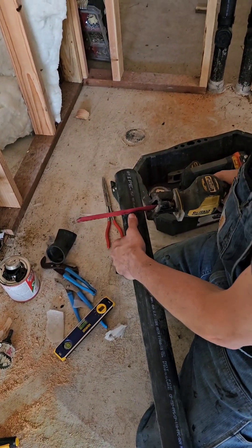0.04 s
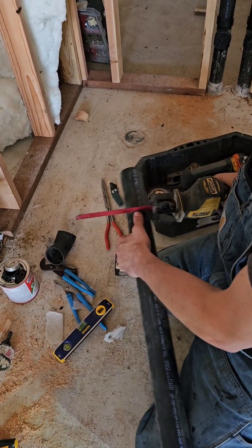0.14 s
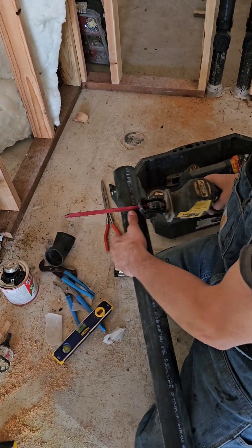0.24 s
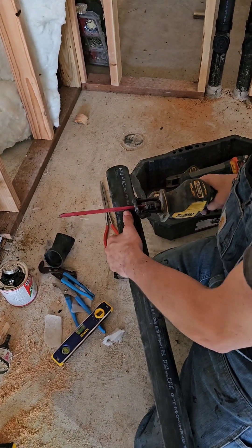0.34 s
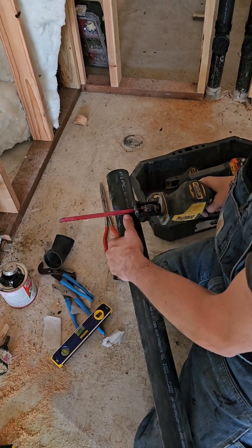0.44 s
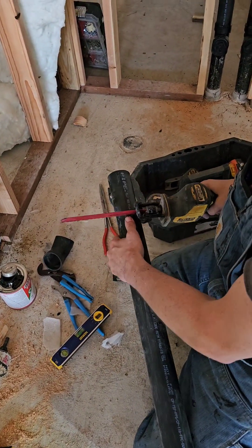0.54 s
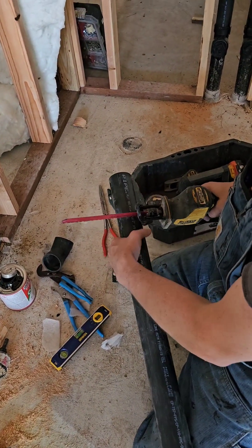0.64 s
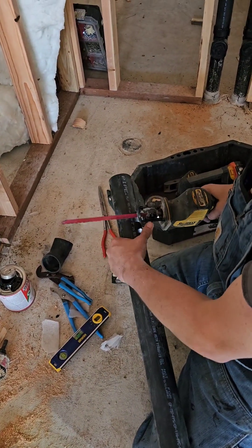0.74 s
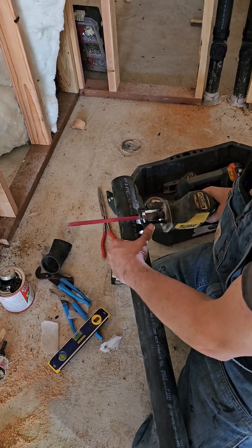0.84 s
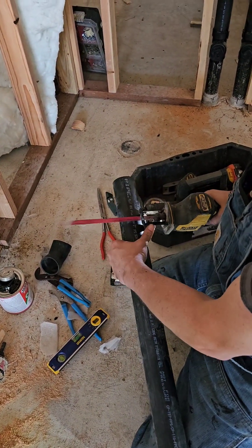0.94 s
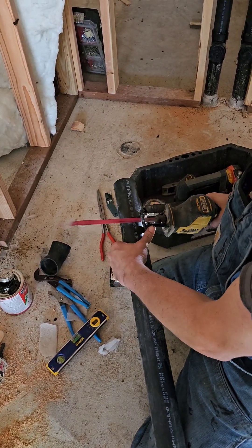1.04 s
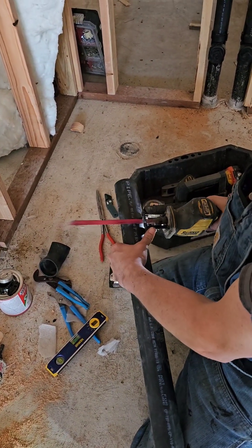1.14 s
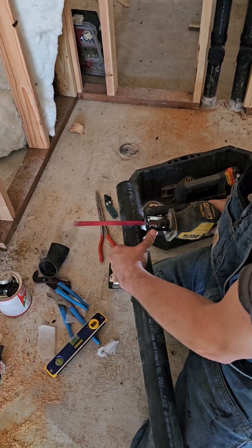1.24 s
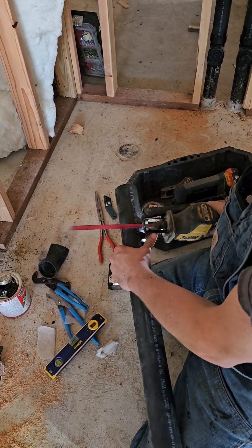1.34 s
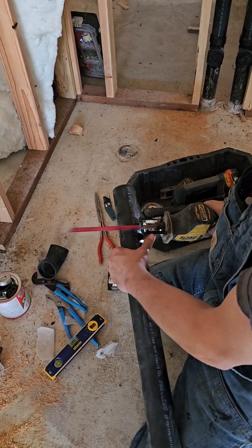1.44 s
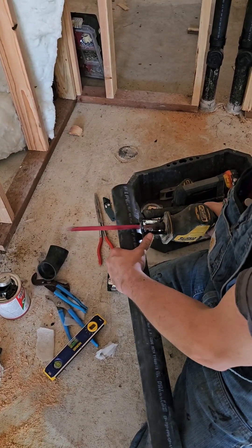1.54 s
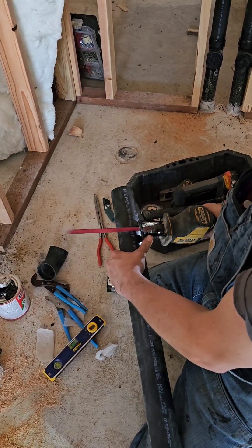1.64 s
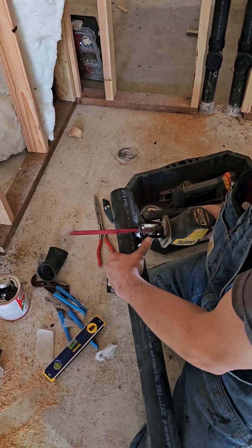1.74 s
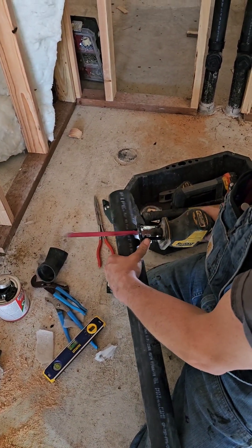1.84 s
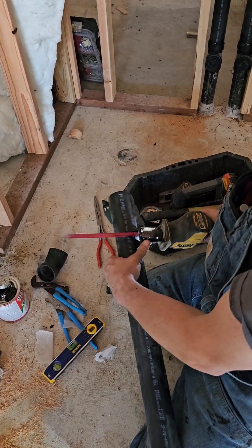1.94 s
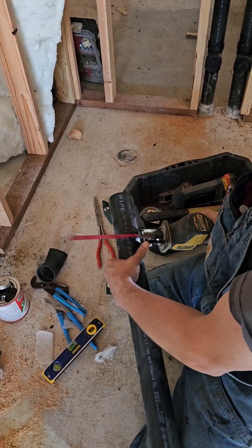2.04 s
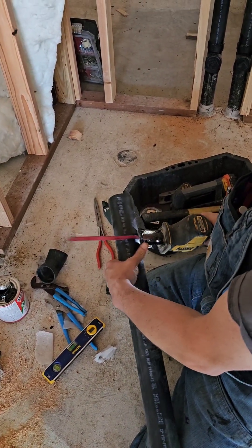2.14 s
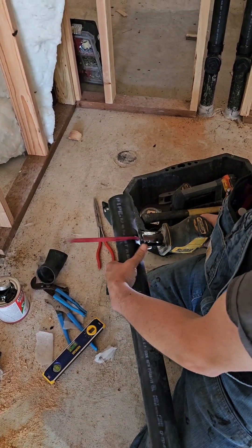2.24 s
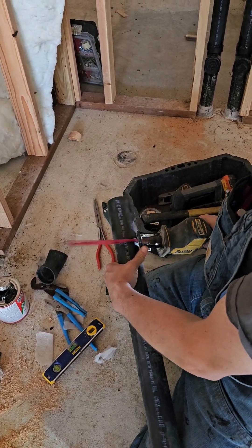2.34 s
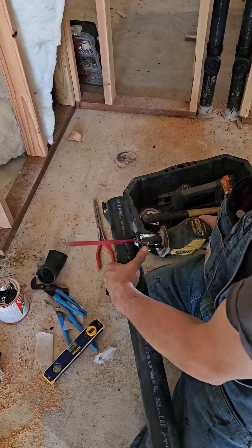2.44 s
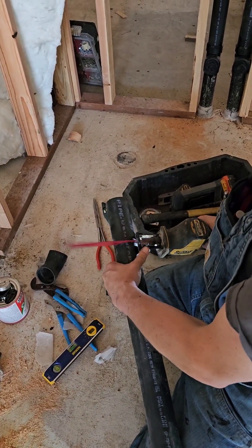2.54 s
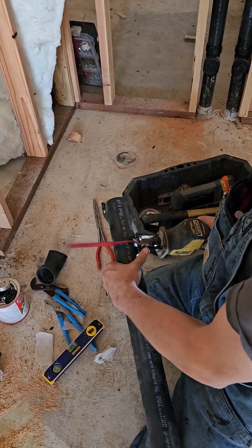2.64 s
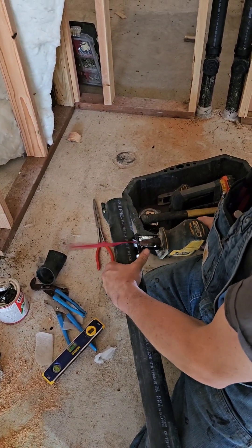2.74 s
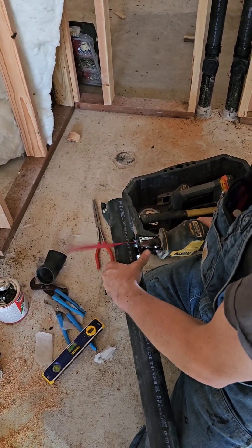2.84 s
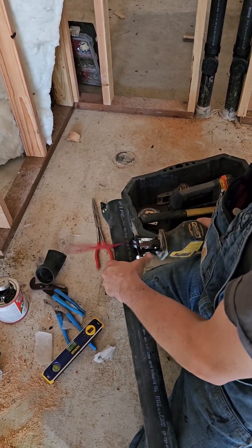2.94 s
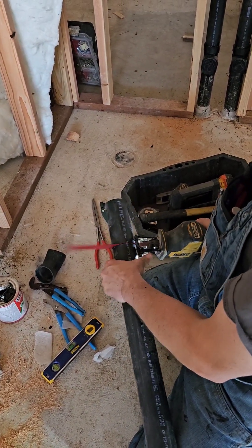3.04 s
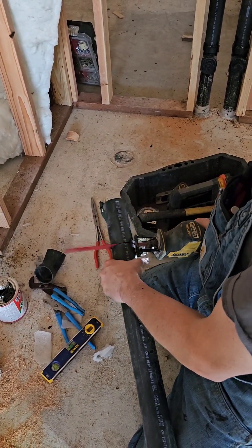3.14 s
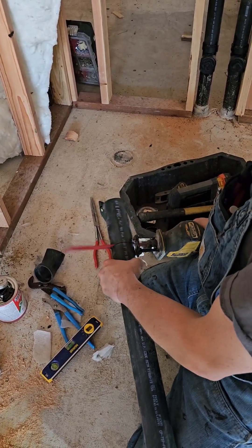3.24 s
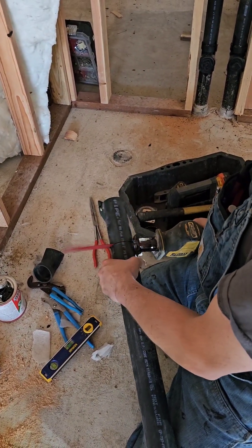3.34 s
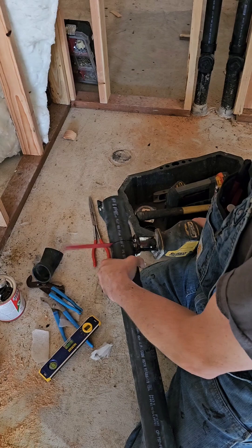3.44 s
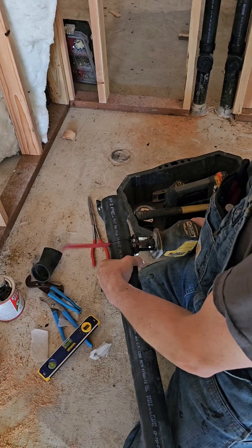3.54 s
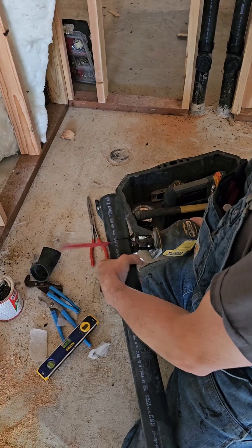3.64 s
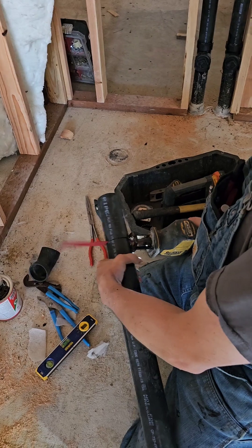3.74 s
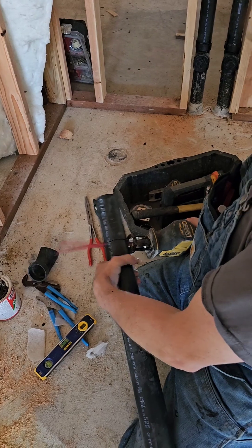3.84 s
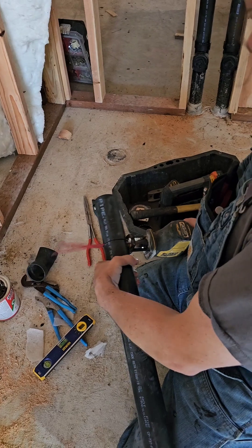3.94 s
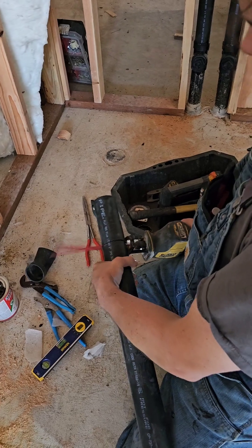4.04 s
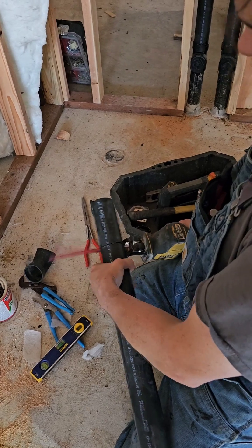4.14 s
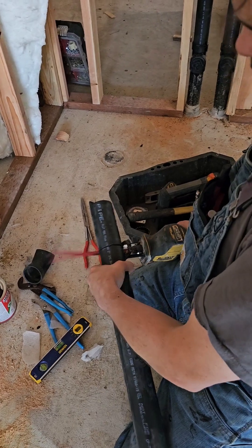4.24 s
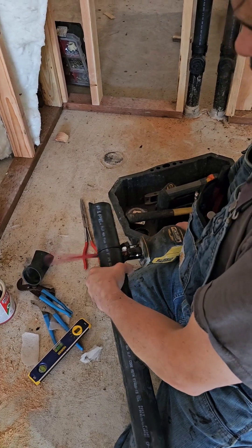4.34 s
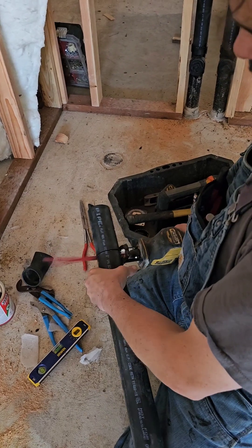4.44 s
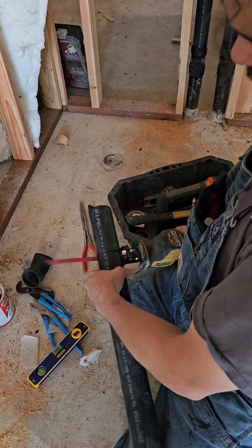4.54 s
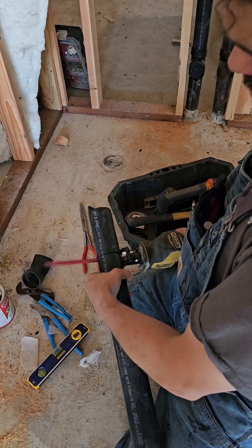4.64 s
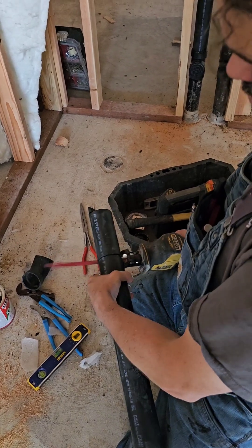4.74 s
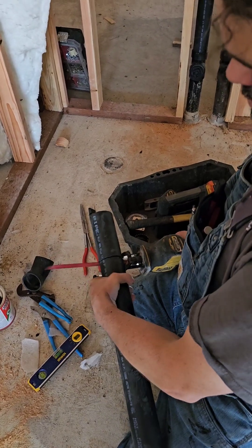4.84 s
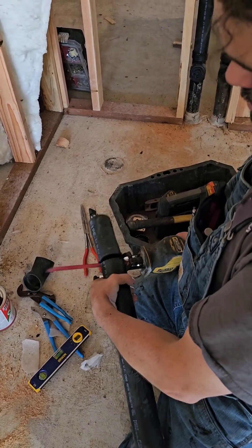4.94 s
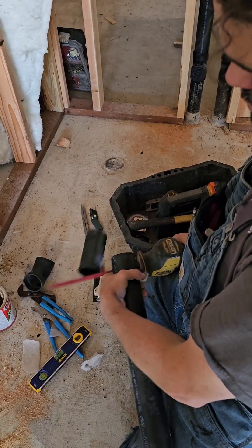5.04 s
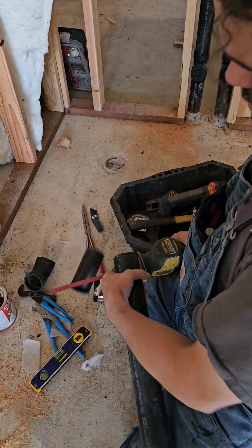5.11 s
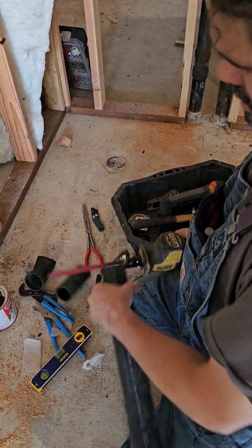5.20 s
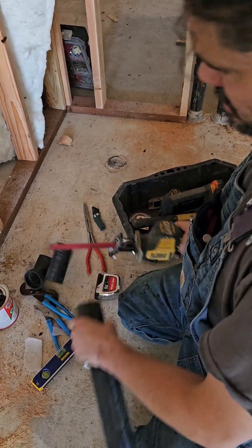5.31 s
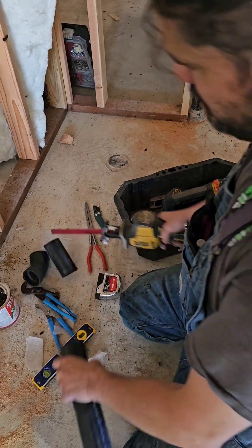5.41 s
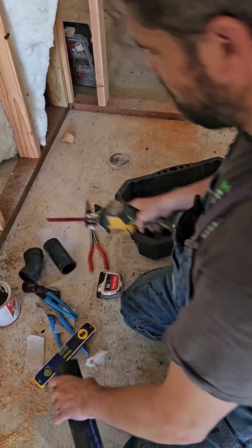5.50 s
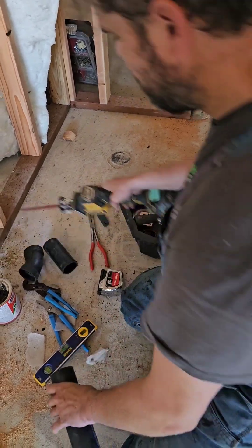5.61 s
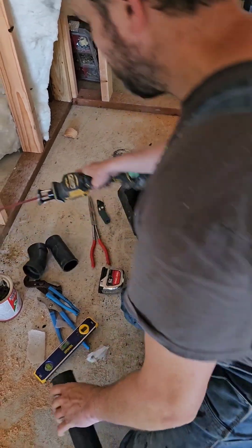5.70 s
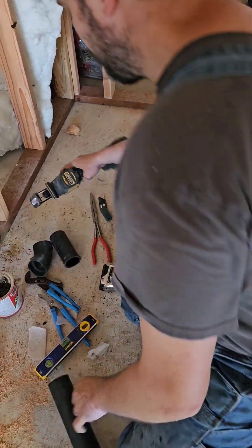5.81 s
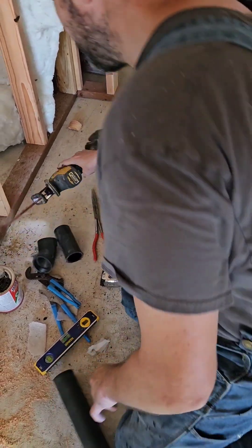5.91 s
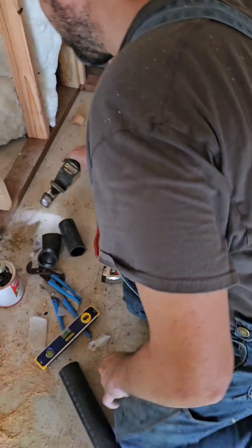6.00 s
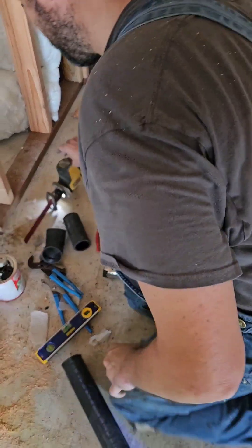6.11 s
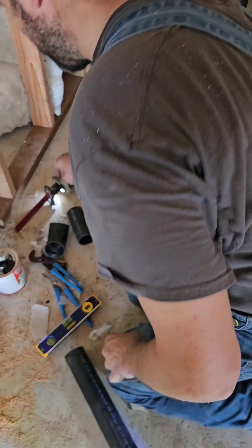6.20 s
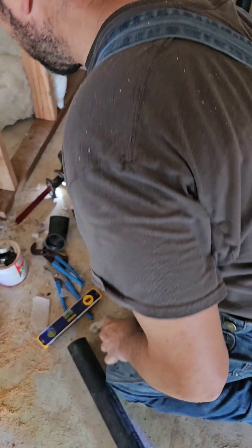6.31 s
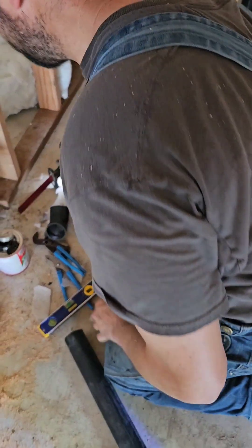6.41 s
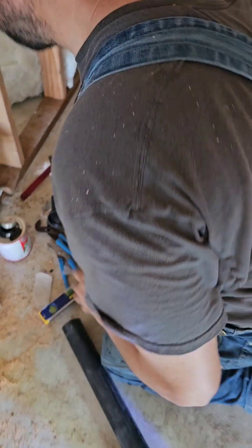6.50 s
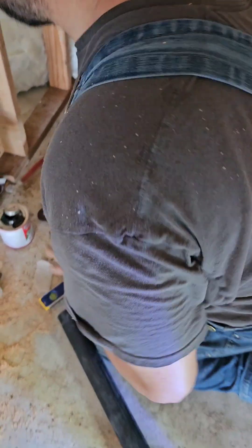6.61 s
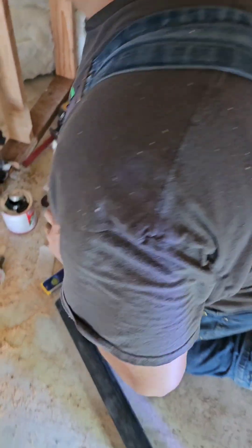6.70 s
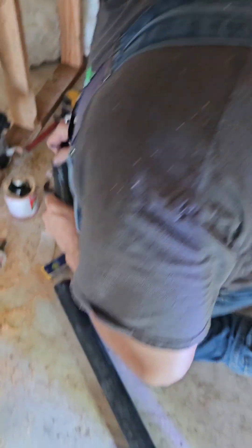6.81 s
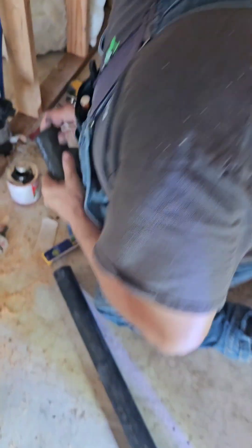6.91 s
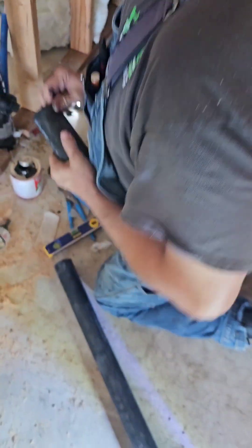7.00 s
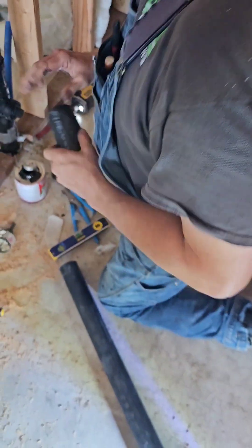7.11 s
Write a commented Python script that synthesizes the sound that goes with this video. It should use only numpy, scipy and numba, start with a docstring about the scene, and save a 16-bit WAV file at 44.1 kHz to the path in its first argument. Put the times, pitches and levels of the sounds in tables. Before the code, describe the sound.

Light handling knocks, then a harsh buzzing power saw chews through hollow plastic pipe, coasts to a stop, and pieces are set down with rustling cloth.

```python
"""Over a low beating hum, a plastic pipe and tools are knocked about, clothes rustle and bright metallic clicks ring.
A cordless reciprocating saw then spins up to about 46 strokes a second: filtered noise clacks with the gear at
both ends of the stroke, the teeth bite on the pull, and jolts shake resonators tuned to the pipe.
The motor coasts to rest; saw and pipe are set down with blows of noise and ringing modes, squeaks and rustling.
The room adds a short decaying noise tail to the saw, blows, clicks and squeaks."""
import sys
import numpy as np
from scipy import signal
from scipy.fft import rfft, irfft
from scipy.io import wavfile
from scipy.ndimage import uniform_filter1d
from numba import njit

SR = 44100
rng = np.random.default_rng(int(sys.argv[2]) if len(sys.argv) > 2 else 0)


def put_to_file(sound):
    """Save the sound as 16-bit audio at rate SR, in the file named by the first command-line argument."""
    columns = np.atleast_2d(sound).T  # one column per channel
    safe = np.clip(columns, -1, 1)
    whole_steps = np.round(safe * 32767)
    wavfile.write(sys.argv[1], SR, whole_steps.astype(np.int16))


N = 315756
BINS_HZ = np.maximum(np.fft.rfftfreq(N, 1 / SR), 1)

# Gently wavering low hum tones, which are nearly in step at IN_STEP_S, and the rumble beneath them.
HUM_TONES_HZ, IN_STEP_S = (54.28, 58.78, 60.53), .974
# Mean levels of the three tones in dB.
HUM_TONES_DB = (-41.5, -44.5, -49)
# Rumble spectrum. Each row: frequency in Hz, relative density in dB per Hz.
HUM = [(20, -11), (40, 2), (58, 4), (80, 3), (120, 2.5), (150, -19.5), (300, -17), (500, -47)]
HUM_DB = -42.5

# Blows of pipe and saw. Each row: start in seconds, relative crack in dB, relative ring in dB,
# frequency in Hz near which modes ring most, relative thud in dB, crack decay in seconds for 60 dB.
KNOCKS = [(0.095, -30.5, -36.5, 1300, -37, 0.029), (0.1761, -25, -51, 791, -19.5, 0.04),
          (0.1915, -28, -37, 1450, -34, 0.031), (0.721, -45, -48, 1540, -42, 0.15),
          (5.183, -4.5, -38, 1970, -57, 0.032), (5.349, -20, -42, 1230, -59, 0.056),
          (5.565, -23.5, -56, 1020, -61, 0.02), (5.602, -25, -38, 1435, -53, 0.049),
          (5.6536, -36, -44, 1420, -46, 0.078), (5.768, -30, -49, 2270, -41, 0.22),
          (5.7839, -26, -22.5, 600, -15, 0.13), (5.8, -8.5, -8, 1920, -11, 0.018),
          (5.896, -18.5, -23, 2280, -17, 0.034), (5.9194, -11.5, -27.5, 950, -18, 0.012),
          (5.966, -18, -28.5, 1440, -26, 0.031), (6.1069, -11.5, -21.5, 1230, -24, 0.098),
          (6.199, -35, -29, 720, -25, 0.083), (6.214, -27, -46, 710, -45, 0.13),
          (6.612, -24, -30.5, 800, -45, 0.21), (6.7118, -34, -34, 740, -47, 0.11),
          (6.785, -30, -46, 600, -42, 0.046), (6.939, -34, -48, 600, -28.5, .05),
          (6.998, -31, -56, 2080, -36, 0.042)]
# Ringing modes of the pipe. Each row: frequency in Hz, relative level in dB, t60 in seconds.
PIPE = [(472, 6.5, 0.22), (750, -2, 0.13), (997, 4, 0.1), (1256, 0.5, 0.035), (1426, -1.5, 0.092),
        (1930, 0, 0.027), (2070, -1.5, 0.026), (2320, -3, 0.037)]
# Modes of the short offcut. Each row: frequency in Hz, relative level in dB, t60 in seconds.
OFFCUT = [(395, -10, .08), (590, -19, 0.073), (834, 3.5, 0.044), (1270, -0.5, 0.053), (1495, -2, .07),
          (1980, -1, .06), (2500, 0, .05)]
OFFCUT_S = 6.05  # from then on the offcut is what is knocked
# Modes of the floor boards. Each row: frequency in Hz, relative level in dB, t60 in seconds.
THUD = [(111, -26, 0.051), (203, -44, 0.049), (233, -18, 0.063), (350, -19, 0.012)]
SNAP_DB, SNAP_T60_S = 1, 0.0096  # the first instant of a blow, against its tabled crack
BRIGHT_PER_DB = 0.6  # extra treble dB per dB of crack: harder blows crack brighter
RUB_WIDTH_HZ, RUB_LIFT_DB = 70, 7  # cracks and scuffs are coloured by the pipe modes
# The saw is put down to the right. Each row: time in seconds, left minus right of the bright clicks in dB.
ASIDE = [(5.4, 0), (5.48, -2.5), (5.8, -6), (6.2, -3), (6.4, 0)]

# Swishes of cloth and hands. Each row: time of the height in seconds, swell in seconds, fade in seconds,
# hiss in dB, thin treble hiss in dB, dull scuff in dB.
SWISHES = [(0.11, 0.011, 0.17, -44.5, -58, -57), (0.17, 0.054, 0.15, -41, -44, -38.5),
           (0.48, 0.064, .08, -70, -57, -84), (0.61, 0.092, 0.22, -59, -53.5, -54),
           (5.44, 0.72, 0.32, -45.5, -68, -45.5), (5.6, 0.11, 0.22, -70, -66, -47.5),
           (5.83, 0.051, 0.64, -50, -67, -30), (5.96, 0.18, 0.17, -38.5, -59, -42),
           (6.115, 0.094, 0.12, -29, -47, -32), (6.211, 0.044, 0.065, -33.5, -27, -41),
           (6.44, 0.15, 0.73, -48.5, -68, -78), (6.715, 0.03, 0.086, -37, -55, -44),
           (6.79, 0.12, 0.078, -34, -45, -37), (6.945, 0.09, 0.15, -35.5, -46, -39),
           (7.06, .1, 0.27, -74, -49, -72)]
SWISH_DEPTH_DB = 22  # level change over one swell time or one fade time
STIR_S, STIR_HISS_DB, STIR_SCUFF_DB = 0.13, -73.5, -73  # faint stirring from then on
# Cloth spectrum. Each row: frequency in Hz, relative density in dB per Hz.
CLOTH = [(590, -45), (1000, -6), (2030, -5), (2330, -5), (3800, -2), (5570, -6), (7440, -5.5), (16000, -18)]
# Thin treble cloth spectrum. Each row: frequency in Hz, relative density in dB per Hz.
FINE_CLOTH = [(3000, -29), (7000, 4), (12000, 3), (16000, 0)]
# Dull scuff spectrum. Each row: frequency in Hz, relative density in dB per Hz.
SCUFF = [(100, 11.5), (200, 16), (500, -2), (1500, -6.5), (3000, -21), (6000, -46)]

# Short bright metallic clicks, among them the saw's first clacks. Each row: start in seconds,
# relative peak in dB, relative treble in dB, ring in dB, frequency in Hz near which modes ring most.
TICKS = [(0.252, -3, -6, -18.5, 7950), (0.8425, -45, -35, -58, 6460), (0.9034, -8, -5, -42, 6500),
         (5.4226, -23, -44, -37, 5100), (5.458, -29, -50, -38, 3700), (5.4875, -20, -6.5, -13, 4070),
         (5.5896, -28, -20.5, -37, 8000), (5.9168, -42, -30, -22, 8200), (5.9648, -42, -22, -24.5, 8300),
         (6.3866, -33, -44, -41, 4300), (6.4, -28, -46, -40, 4300), (6.433, -26, -46, -42, 4250),
         (6.494, -25, -52, -43.5, 4300), (6.579, -33, -48, -46, 4300), (7.1437, -41, -39, -55, 5030)]
# Modes of the metallic ring. Each row: frequency in Hz, relative level in dB, t60 in seconds.
METAL = [(1900, -6, 0.0079), (3420, -4.5, 0.044), (3860, -5, 0.028), (4380, -5, 0.027), (5200, -4.5, .015),
         (6400, 4.5, 0.018), (6800, -12, .02), (7970, 4.5, 0.022), (11200, 2, 0.034), (14900, 3, .015)]
# Short squeaks. Each row: start in seconds, length in seconds, start pitch in Hz, end pitch in Hz, level in dB.
SQUEAKS = [(0.255, 0.033, 1200, 1010, -35), (5.347, 0.047, 1190, 1150, -31.5),
           (6.87, 0.03, 2030, 1870, -43), (6.893, 0.039, 1950, 2030, -46)]

# Crank motion: spin-up, steady running, coasting. Each row: time in seconds, strokes done;
# a whole number starts a pull.
STROKES = [(0.83, 0.9), (0.84, 1.0), (0.875, 1.45), (0.903, 2.0), (0.932, 3.0), (1.1, 10.04), (1.3, 19.02),
           (1.55, 30.52), (2.15, 58.32), (3.35, 113.42), (3.95, 141.09), (4.85, 182.74), (5.05, 192.22),
           (5.255, 202.0), (5.279, 203.0), (5.3085, 204.0), (5.3285, 204.5), (5.35, 205.0), (5.45, 205.45)]
FULL_SPEED = 46  # strokes a second
MOTOR_DB, DB_PER_HALF_SPEED = -17.5, 6.5  # level at full speed; loss per halving of speed
RELEASE_S, COAST_DB_PER_S = 5.28, 72  # the trigger is let go
COAST_HUSH_DB_PER_S = 70  # coasting, the hiss loses this as well
# Motor spectrum. Each row: frequency in Hz, relative density in dB per Hz.
MOTOR = [(300, -35), (500, -12), (1400, -5), (2700, -0.5), (3200, -1.5), (5000, -3.5), (7500, -2.5),
         (12300, -4), (14000, -3.5), (16000, -8)]
# Resonances of the saw housing. Each row: frequency in Hz, width in Hz, relative lift in dB.
HOUSING = [(6220, 250, -3), (7700, 900, 0), (11400, 400, -6), (14450, 600, 0), (15600, 700, 0)]
# Gear backlash spectrum. Each row: frequency in Hz, relative density in dB per Hz.
CLACK = [(1500, -23), (4000, -1.5), (8000, -1), (11000, -0.5), (16000, 2.5)]
CLACK_DB = -6  # against the motor
WHINE_DB, WHINE_PER_BITE, WHINE_TOP_DB = -23, -1.7, -3  # against the motor; louder as the blade runs free
# Rough resonances in the rasp. Each row: mean frequency in Hz, wander in Hz, t60 in seconds,
# mean level against the motor in dB.
RASP = [(1274, 100, 0.0055, -14.5), (3120, 69, 0.0064, -17.5), (4450, 78, 0.0037, -18),
        (6280, 130, 0.0043, -14), (7480, 280, 0.0024, -15), (11140, 390, 0.0049, -18.5)]
RASP_SWELL_DB = 3.3
# Faint gear whine. Each row: multiple of the stroke rate, relative level in dB.
GEARS = [(69.2, -21.5), (96.0, -26)]

# Course of the cut. Each row: time in seconds, then levels in dB relative to the motor: bite of the teeth,
# shake of the pipe, bounce at every second pull, hollow ring.
CUT = [(0.83, -11.5, -6, -47, -26), (0.95, -6.5, -10.5, -38, -14), (1.15, -2, -4, -10, -16),
       (1.34, -1, -0.5, -7, -27), (1.48, -9.5, -5, -14, -18), (1.8, -4.5, -3.5, -13, -24),
       (2.1, -2, -5, -7.5, -19), (2.3, -1.5, -1.5, -16, -24), (2.7, 1, -3.5, -11, -13.5),
       (3.1, 0.5, -1.5, -9.5, -12.5), (3.25, 0, 0, -10, -13), (3.45, -2, -9.5, -55, -23),
       (3.9, -2, -8.5, -35, -15), (4.1, -1, -11, -13, -6), (4.4, -4, -14, -22, -15.5),
       (4.7, -7.5, -12, -50, -19.5), (4.95, -5.5, -12, -42, -24), (5.1, -34, -26.5, -52, -11.5),
       (5.26, -9.5, -27, -45, -27), (5.423, -51, -19, -45, -14)]
# Spectrum of the teeth. Each row: frequency in Hz, relative density in dB per Hz.
TEETH = [(70, -6), (150, 0.5), (400, -4.5), (1000, 3), (2000, 3), (4000, -5.5), (8000, -2.5),
         (16000, -16.5)]
# Resonances of the pipe wall under the teeth. Each row: frequency in Hz, width in Hz, relative lift in dB.
WALL = [(610, 18, 10.5), (1000, 88, 3.5), (1080, 17, 8.5), (1425, 114, 8), (1626, 39, -1), (2237, 61, -9.5),
        (3070, 110, 2), (3810, 390, 2), (4340, 190, -1), (5480, 280, -3)]
HOLLOW_HZ, HOLLOW_WIDTH_HZ = 780, 185
# Blade against the pipe. Each row: time in seconds, slap against the teeth in dB, its mean pitch in Hz,
# relative gear whine in dB.
BLADE = [(0.9, -29, 1840, 16), (1.3, -10.5, 1910, -5), (1.5, -10, 1910, 16.5), (2.0, -10.5, 1850, 3.5),
         (2.25, -12.5, 1870, -10), (2.65, -17.5, 1850, -3), (3.0, -11, 1890, -16), (3.5, -17, 2130, -10),
         (4.05, -11.5, 2130, 2), (4.4, -11, 2120, 3), (4.7, -13, 2090, 8), (5.2, -15, 2090, -4)]
SLAP_WANDER_HZ = 59

# The shaken pipe's pitch rises with the motor, falls, then keeps wandering through the cut. Each row:
# time in seconds, mean pitch in Hz, overtone in Hz, overtone against the shake in dB.
SHAKE_PITCH = [(0.84, 190, 400, -14), (0.92, 310, 440, -10), (1.0, 285, 450, -12), (1.11, 228, 455, -8),
               (1.37, 212, 430, -9), (1.45, 240, 450, -12), (1.88, 208, 440, -10), (2.2, 228, 440, -9),
               (2.42, 275, 445, -10), (2.6, 225, 440, -6), (3.15, 215, 455, -6), (3.4, 225, 425, -5),
               (3.83, 245, 420, -4), (4.1, 210, 420, -6), (4.9, 234, 420, -8)]
# Steady pipe modes beside the moving ones. Each row: frequency in Hz, relative level in dB, t60 in seconds.
SHAKE = [(250, -6, .04), (315, -4, .04)]
SHAKE_WANDER_HZ, SHAKE_T60_S, OVERTONE_T60_S = 8, .055, .035
UNEVEN = 1.6  # how unequal two pulls jolt a bouncing pipe
SPIN_UP_HUM_DB, SPIN_UP_S = -30, .13  # the pipe hums clearly while the motor gathers speed
# Tones locked to the crank. Each row: multiple of the stroke rate, relative level in dB,
# share of the shake level they follow.
ORDERS = [(2.0, -22, 0.29), (3.0, -32, 0.53), (4.0, -18, 0.92), (5.0, -15, 0.67), (6.0, -13.5, 1)]
BOUNCE_ORDER = 4.5
# Dull spots in the saw's sound. Each row: frequency in Hz, width in Hz, depth from 0 to 1.
DIPS = [(352, 17, 0.84), (537, 106, 0.38), (944, 41, 0.73), (2720, 270, 0.37), (4980, 130, 0.2),
        (5860, 170, 0.4), (6400, 190, 0.32)]

# Likeness of the two sides. Each row: frequency in Hz, share of power common to both.
LIKENESS = [(60, .96), (250, .96), (500, .78), (1000, .52), (2000, .48), (4000, .3), (8000, .42),
            (15000, .38)]
# Balance of the sides. Each row: frequency in Hz, left minus right in dB.
TILT = [(60, -3), (180, 0), (550, -1), (1650, 0.5), (4970, -2), (15000, 0.5)]
# Phase of the common part. Each row: frequency in Hz, lead of the left in radians.
LEAD = [(20, -0.73), (430, 0.4), (1000, -2.04), (1900, -0.26), (3000, 1.35), (5600, 0.88), (9400, 1.73),
        (16000, 1.35)]
ROOM_T60_S, ROOM_DB = 0.27, -11.5
CUTOFF_HZ = 15740


def from_db(db):
    """Decibel law: the amplitude gain of a level."""
    return 10 ** (np.asarray(db) / 20)


def fade_per_sample(t60):
    """Exponential decay: the pole radius that loses 60 dB in t60 seconds."""
    return from_db(-60 / (t60 * SR))


def rms_one(x):
    """Normalisation of power: scaled to rms 1."""
    return x / np.sqrt(np.mean(x ** 2) + 1e-20)


def in_time(rows):
    """Linear interpolation: the columns of a curve, sample by sample."""
    s, *columns = np.transpose(rows)
    return [np.interp(np.arange(N) / SR, s, c) for c in columns]


def at_bins(points):
    """Interpolation on a logarithmic frequency axis, at every bin."""
    hz, value = np.transpose(points)
    return np.interp(np.log(BINS_HZ), np.log(np.maximum(hz, 1)), value)


def drift(rate):
    """Low-passed noise: a random wander of spread 1, mostly slower than a rate in Hz."""
    return rms_one(irfft(rfft(rng.standard_normal(N)) / (1 + (BINS_HZ / rate) ** 2), N))


def band(x, low_hz, high_hz):
    """Causal band-pass filtering."""
    return signal.sosfilt(signal.butter(2, [low_hz, high_hz], "band", fs=SR, output="sos"), x)


def ring(x, modes):
    """Modal superposition: x excites every mode as a damped two-pole resonator."""
    out = 0
    for hz, db, t60 in modes:
        r, w = fade_per_sample(t60), 2 * np.pi * hz / SR
        out = out + signal.lfilter([0, from_db(db) * np.sin(w)], [1, -2 * r * np.cos(w), r * r], x + 1e-18)
    return out


@njit
def glide(x, hz, r, sr):
    """Time-varying resonance: a two-pole resonator whose pitch moves."""
    y = np.zeros(len(x))
    for i in range(2, len(x)):
        w = 2 * np.pi * hz[i] / sr
        y[i] = np.sin(w) * x[i - 1] + 2 * r * np.cos(w) * y[i - 1] - r * r * y[i - 2]
    return y


def pair(common, own):
    """Partial coherence: spectra of two sides from a phase-shifted common part and independent parts."""
    alike = np.clip(at_bins(LIKENESS), 0, 1)
    sides = np.array([[1], [-1]])
    shifted = rfft(common) * np.exp(.5j * sides * at_bins(LEAD))
    mixed = np.sqrt(alike) * shifted + np.sqrt(1 - alike) * rfft(own)
    return mixed * from_db(sides * at_bins(TILT) / 2)


def resonance(hz, width):
    """Resonance curve: a Lorentzian of height 1."""
    return 1 / (1 + (2 * (BINS_HZ - hz) / width) ** 2)


def hiss(envelope, spectrum, peaks=(), lift_db=0):
    """Source and filter: stereo noise under an envelope, coloured and lifted at resonances; rms 1."""
    white = envelope * rng.standard_normal((3, N))
    bumps = 1 + sum(from_db(lift_db + db) * resonance(hz, width) for hz, width, db in peaks)
    return rms_one(irfft(pair(white[0], white[1:]) * bumps * from_db(at_bins(spectrum)), N))


def clicks(times, db):
    """Impulse excitation: a one-sample click at each time."""
    out = np.zeros(N)
    out[(np.asarray(times) * SR).astype(int)] = from_db(db)
    return out


def dying(times, db, t60):
    """Transient envelope: a rise within a millisecond or two, then exponential decay."""
    out, t = np.zeros(N), np.arange(SR // 2) / SR
    for s, level_db, decay in zip(times, db, t60):
        i = int(s * SR)
        fall = from_db(level_db - 60 * t / max(decay, .005))
        rise = 1 - np.exp(-t / 0.0013)
        out[i:i + len(t)] += (fall * rise)[:N - i]
    return out


def struck(times, db, near_hz, modes, reach_db):
    """Selective modal excitation: modes weaken by reach_db for each octave from near_hz."""
    out = 0
    for mode in modes:
        octaves = np.abs(np.log2(mode[0] / near_hz))
        out = out + ring(clicks(times, db - reach_db * octaves), [mode])
    return out


def rubbed():
    """Resonant colouring: pipe modes, and two of the offcut's, as peaks in a noise."""
    return [(hz, RUB_WIDTH_HZ, RUB_LIFT_DB) for hz, db, t60 in PIPE + OFFCUT[1:3]]


def aside():
    """Level-difference panning: left and right gain of the bright clicks."""
    pan_db, = in_time(ASIDE)
    return from_db(np.array([[.5], [-.5]]) * pan_db)


def hum():
    """Beating: wavering low tones of nearby frequency interfere, over rumble."""
    t = np.arange(N) / SR - IN_STEP_S
    tones = 0
    for hz, db in zip(HUM_TONES_HZ, HUM_TONES_DB):
        tones = tones + from_db(db + 2.2 * drift(3)) * np.cos(2 * np.pi * hz * t + .3 * drift(3))
    return np.sqrt(2) * tones + from_db(HUM_DB) * hiss(1, HUM)


def knocks():
    """Impact: each blow is a crack of noise, the modal ring of the pipe and a thud in the floor."""
    s, crack_db, ring_db, near_hz, thud_db, decay = np.transpose(KNOCKS)
    snap = dying(s, crack_db + SNAP_DB, np.full(len(s), SNAP_T60_S))
    body = dying(s, crack_db - 3, decay)
    grain = from_db(1.96 * drift(150))
    out = (snap + body) * hiss(grain, [(500, -4.5), (2000, -3.5), (4000, -1.0), (16000, -11)], rubbed())
    bright = dying(s, (1 + BRIGHT_PER_DB) * crack_db - 0.5, decay)
    out = out + aside() * bright * hiss(1, [(1500, -25), (4000, -12.0), (9000, 7), (16000, -4)])
    for hit, modes, reach_db in (s < OFFCUT_S, PIPE, 17.0), (s >= OFFCUT_S, OFFCUT, 9.0):
        out = out + struck(s[hit] + 0.001326, ring_db[hit] + 0.5, near_hz[hit], modes, reach_db)
    return out + ring(band(clicks(s, thud_db + 16.5), 72, 400), THUD)


def rustle():
    """Friction noise: grainy cloth hiss and dull scuffing swell and fade with each move."""
    t = np.arange(N) / SR
    cloth = hiss(from_db(2.7 * drift(60) + 1.5 * drift(400)), CLOTH)
    fine = hiss(from_db(2.0 * drift(80)), FINE_CLOTH)
    scuff = hiss(from_db(2.0 * drift(16) + 2.0 * drift(110)), SCUFF, rubbed())
    out = (t > STIR_S) * (from_db(STIR_HISS_DB) * cloth + from_db(STIR_SCUFF_DB) * scuff)
    for s, swell, fade, hiss_db, fine_db, scuff_db in SWISHES:
        shape = from_db(-SWISH_DEPTH_DB * np.where(t < s, (s - t) / swell, (t - s) / fade))
        out = out + shape * (from_db(hiss_db) * cloth + from_db(fine_db) * fine + from_db(scuff_db) * scuff)
    return out


def ticks():
    """Impact of metal: a sharp click of noise and a short modal ring."""
    s, peak_db, treble_db, ring_db, near_hz = np.transpose(TICKS)
    decay = np.full(len(s), .009)
    snap = dying(s, peak_db - 2.0, decay) * hiss(1, [(500, -9), (2000, 8.0), (6000, 1.5), (16000, -28)])
    treble = dying(s, treble_db + 7.0, decay) * hiss(1, [(3000, -11), (8000, 4), (12000, -1), (16000, -3.5)])
    return aside() * (snap + treble + struck(s + 0.0007, ring_db, near_hz, METAL, reach_db=9.0))


def squeaks():
    """Frequency modulation: slightly rough gliding tones that swell fast and fade."""
    out, waver = np.zeros(N), 1 + 0.024 * drift(60)
    for s, length, from_hz, to_hz, db in SQUEAKS:
        u = np.linspace(0, 1, int(length * SR))
        span = slice(int(s * SR), int(s * SR) + len(u))
        hz = (from_hz + (to_hz - from_hz) * u) * waver[span]
        out[span] += from_db(db) * np.sin(np.pi * u ** 0.42) * np.sin(2 * np.pi * np.cumsum(hz) / SR)
    return out * from_db(4.1 * drift(150))


def motor_and_clack(clack, hush):
    """Backlash: motor noise pulses, and brighter noise clacks, as the gear takes up its play."""
    motor = hush * hiss((1 + 0.79 * clack) * from_db(1.0 * drift(40)), MOTOR, HOUSING, lift_db=-2)
    return motor + from_db(CLACK_DB) * hiss(clack, CLACK, HOUSING, lift_db=7)


def rasp(envelope):
    """Wandering resonance: noise in narrow bands, each swelling on its own."""
    out, white = 0, envelope * rng.standard_normal((3, N))
    for hz, wander_hz, t60, db in RASP:
        pitch, swell = hz + wander_hz * drift(2.7), from_db(db + RASP_SWELL_DB * drift(4.8))
        out = out + swell * rms_one(np.array([glide(w, pitch, fade_per_sample(t60), SR) for w in white]))
    return irfft(pair(out[0], out[1:]), N)


def gears(turns):
    """Gear mesh: rough, wavering tones at multiples of the stroke rate."""
    out = 0
    for k, db in GEARS:
        out = out + from_db(db + 0.98 * drift(32)) * np.sin(2 * np.pi * k * turns + 0.54 * drift(20))
    return out


def teeth(pull, luck, tear):
    """Chip formation: noise surges in each pull, coloured by the resonances of the pipe wall."""
    bite = .9 * from_db(3.5 * luck) * np.exp(-((pull - .3) / 0.22) ** 2)
    return hiss((1 + bite) * tear, TEETH, WALL, lift_db=-3.5)


def hollow_ring(pull, luck, tear):
    """Cavity-like resonance: noise pulsed by each pull around one broad peak."""
    surge = (1 - np.exp(-pull / .08)) * np.exp(-pull / .2)
    envelope = (.3 + 3.0 * from_db(3.5 * luck) * surge) * tear
    return hiss(envelope, [(400, -26), (700, 8), (900, 6), (1500, -24)], [(HOLLOW_HZ, HOLLOW_WIDTH_HZ, 18)])


def blade_slap(turns, pull, luck, slap_hz):
    """Impact at the start of the pull: a click and a rattle excite a short moving resonance."""
    strike = np.roll(np.diff(turns.astype(int), prepend=0), round(0.001962 * SR))
    rattle = (1 - np.exp(-pull / .05)) * np.exp(-pull / .2) * rng.standard_normal((3, N))
    bursts = from_db(1.8 * luck) * (.6 * strike + .07 * rattle)
    pitch = slap_hz + SLAP_WANDER_HZ * drift(9.4)
    rings = [glide(b, pitch, fade_per_sample(.017), SR) for b in bursts]
    return rms_one(irfft(pair(rings[0], rings[1:]), N))


def shaken_pipe(ends, luck, shake_db, bounce_db):
    """Forced vibration: jolts at the stroke ends drive moving and steady pipe modes; also gives the pitch."""
    turned = np.diff(ends, prepend=ends[0])
    push = np.where(ends % 2, .35, 1)  # the return is weak
    alternate = np.where(ends // 2 % 2, 1, -1)
    push = push * (1 + alternate * np.clip(UNEVEN * from_db(bounce_db - shake_db), 0, .8))
    jolts = np.roll(turned * push * from_db(2.5 * luck), round(0.003 * SR)) + 0.04 * rng.standard_normal(N)
    jolts = band(band(jolts, 175, 500), 160, 900)
    shake_hz, overtone_hz, overtone_db = in_time(SHAKE_PITCH)
    shake_hz = shake_hz + SHAKE_WANDER_HZ * drift(2.1)
    shake = rms_one(glide(jolts, shake_hz, fade_per_sample(SHAKE_T60_S), SR) + ring(jolts, SHAKE))
    overtone = rms_one(glide(jolts, overtone_hz, fade_per_sample(OVERTONE_T60_S), SR))
    return from_db(shake_db - 3) * (shake + from_db(overtone_db) * overtone), shake_hz


def drone(turns, shake_db, bounce_db):
    """Harmonic orders: sines locked to the crank, each wandering in phase and most in level."""
    tones = [(round(k), db + share * shake_db + 2.5 * drift(2.5)) for k, db, share in ORDERS]
    tones = tones + [(BOUNCE_ORDER, bounce_db)]
    out = 0
    for k, db in tones:
        out = out + from_db(db) * np.cos(2 * np.pi * k * (turns - .3) + 0.55 * drift(5))
    return np.sqrt(2) * out


def saw():
    """Periodic excitation: the crank times the motor, gear, teeth and shaken pipe."""
    t = np.arange(N) / SR
    turns, = in_time(STROKES)
    speed = uniform_filter1d(np.gradient(turns) * SR, size=SR // 60) / FULL_SPEED
    coasting = np.maximum(t - RELEASE_S, 0)
    hush = from_db(-COAST_HUSH_DB_PER_S * coasting)
    power_db = MOTOR_DB + DB_PER_HALF_SPEED * np.log2(speed + 1e-3) - COAST_DB_PER_S * coasting
    bite_db, shake_db, bounce_db, hollow_db = in_time(CUT)
    slap_db, slap_hz, gear_db = in_time(BLADE)

    ends = (2 * turns).astype(int)  # stroke ends passed so far
    luck = rng.standard_normal((ends[-1] + 1, 4))[ends].T  # each half stroke differs
    half, pull = 2 * turns % 1, turns % 1
    since = half / np.clip(speed, .3, 1)  # time since the reversal, in full-speed half strokes
    clack = 1.5 * from_db(2.0 * luck[0]) * (1 - np.exp(-since / 0.04)) * np.exp(-since / 0.22)
    tear = from_db(3.2 * drift(1500))  # teeth tear chips unevenly

    whine = hiss(1 + 2.2 * clack, [(7000, -27), (8500, 3.0), (10000, 8), (12000, -2.0), (15000, -29)])
    whine_db = np.minimum(WHINE_DB + WHINE_PER_BITE * bite_db, WHINE_TOP_DB)
    drive = motor_and_clack(clack, hush) + hush * rasp((1 + clack) * tear) + hush * from_db(whine_db) * whine
    drive = drive + from_db(bite_db + gear_db + 2) * gears(turns)
    slap = from_db(slap_db) * blade_slap(turns, pull, luck[3], slap_hz)
    cut = from_db(bite_db) * (teeth(pull, luck[1], tear) + slap)
    cut = cut + from_db(hollow_db) * hollow_ring(pull, luck[3], tear)
    shake, shake_hz = shaken_pipe(ends, luck[2], shake_db, bounce_db)
    pipe = from_db([[-.6], [.6]]) * (shake + drone(turns, shake_db, bounce_db))  # slightly to the right

    from_start = t - STROKES[0][0]
    running = np.clip(from_start / 0.026, 0, 1) * from_db(power_db)
    dips = np.prod([1 - np.clip(depth, 0, 1) * resonance(hz, width) for hz, width, depth in DIPS], axis=0)
    out = irfft(rfft(running * (drive + cut + pipe)) * dips, N)
    spin_up = np.sin(np.pi * np.clip(from_start / SPIN_UP_S, 0, 1))
    return out + from_db(SPIN_UP_HUM_DB) * spin_up * np.sin(2 * np.pi * np.cumsum(shake_hz) / SR)


def room(x):
    """Reverberation: convolution with a decaying noise tail, unlike on the two sides."""
    t = np.arange(SR // 2) / SR
    tail = rng.standard_normal((2, len(t))) * from_db(-60 * t / ROOM_T60_S) * (t > .004)
    tail = tail / np.sqrt(np.sum(tail ** 2, axis=1, keepdims=True))
    return from_db(ROOM_DB) * signal.fftconvolve(x, tail, axes=1)[:, :N]


def scene():
    """Superposition: blows, clicks, squeaks and saw in the room, with rustle and hum."""
    near = knocks() + ticks() + squeaks() + saw()
    return hum() + rustle() + near + room(near)


def record(dry):
    """Saturation and low-pass filtering: peaks are rounded, the top is cut."""
    rounded = 1.05 * np.tanh(dry / 1.05)
    return signal.sosfilt(signal.ellip(16, .3, 75, CUTOFF_HZ, fs=SR, output="sos"), rounded)


dry = scene()
out = record(dry)
put_to_file(out)
```